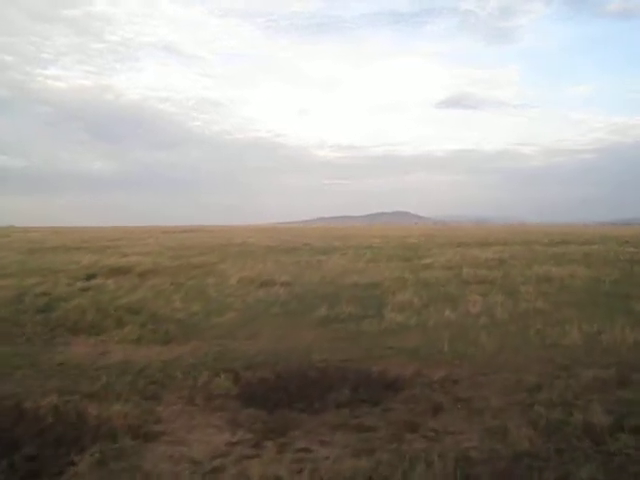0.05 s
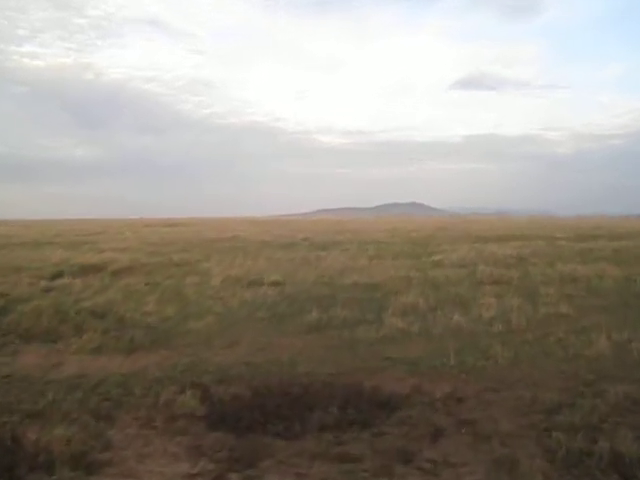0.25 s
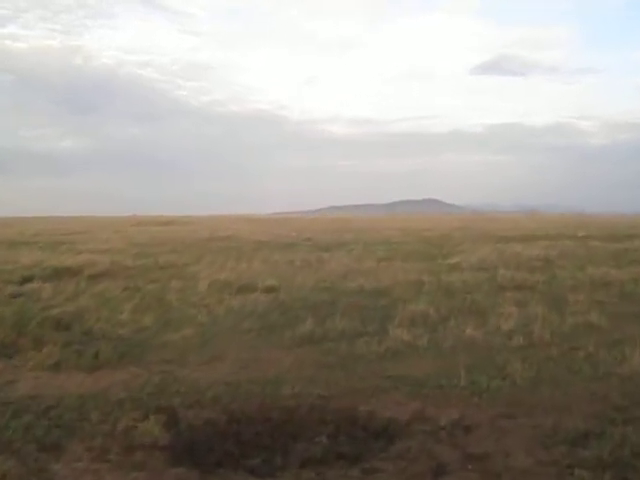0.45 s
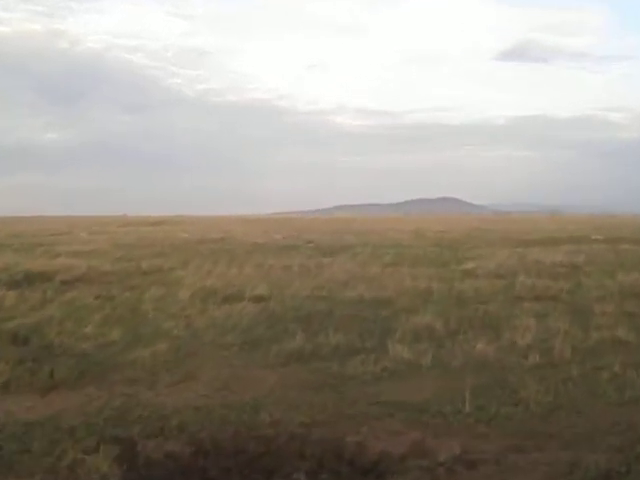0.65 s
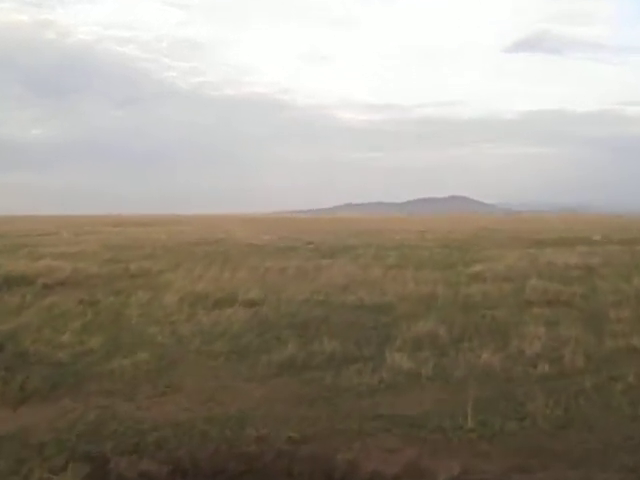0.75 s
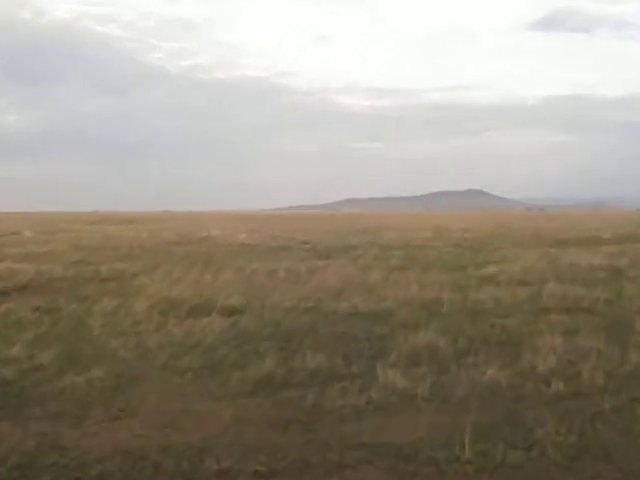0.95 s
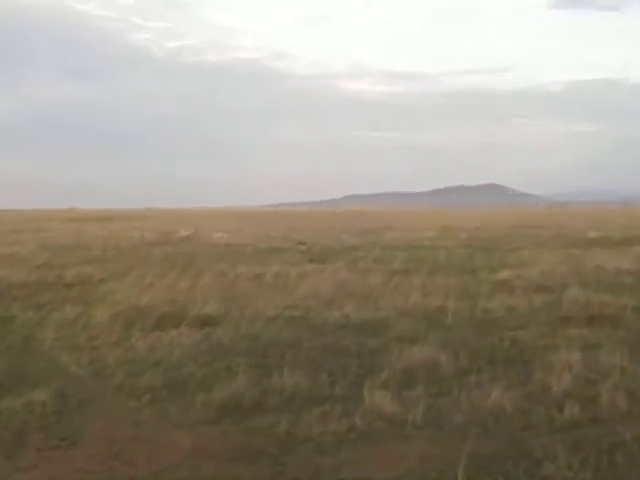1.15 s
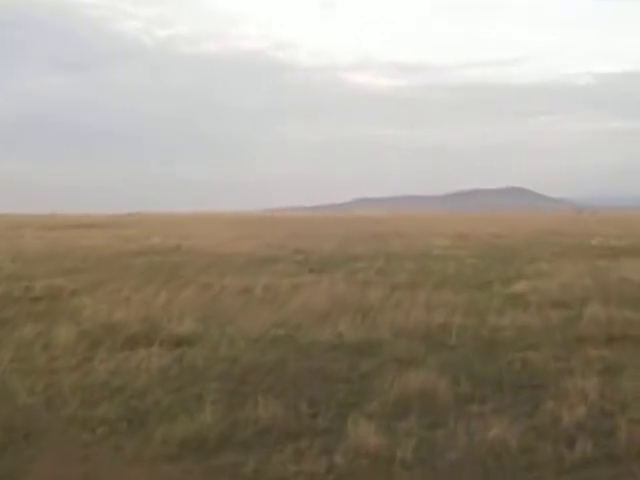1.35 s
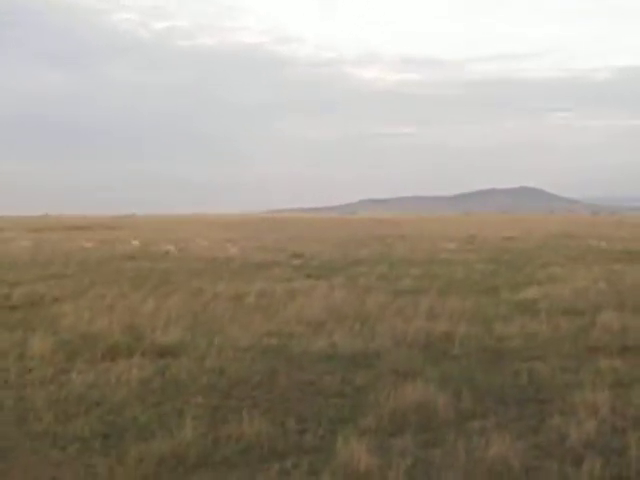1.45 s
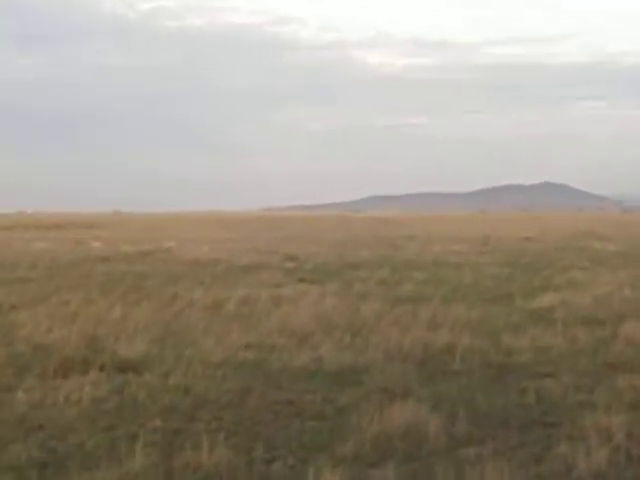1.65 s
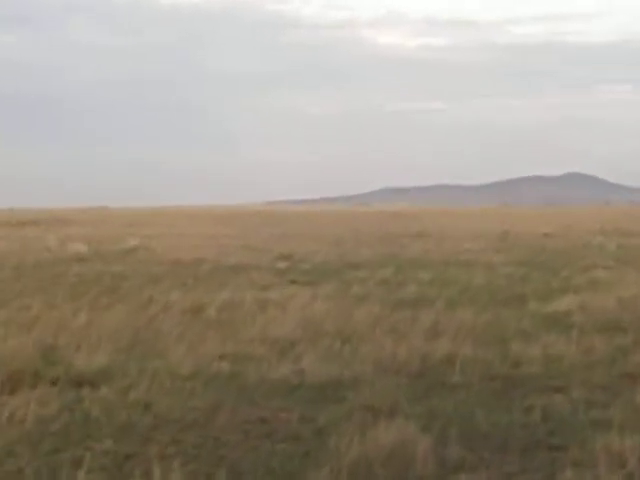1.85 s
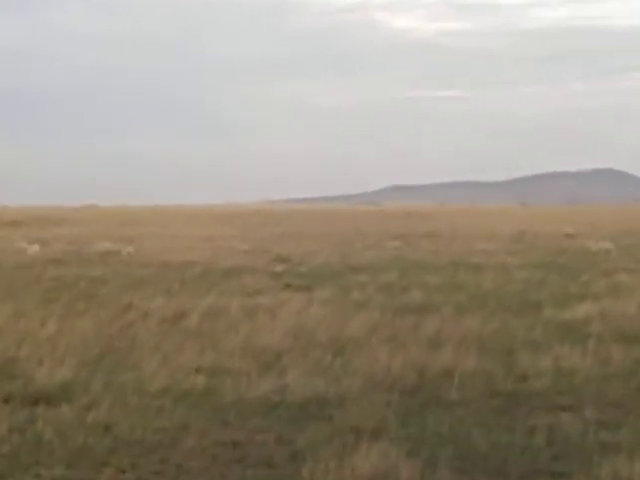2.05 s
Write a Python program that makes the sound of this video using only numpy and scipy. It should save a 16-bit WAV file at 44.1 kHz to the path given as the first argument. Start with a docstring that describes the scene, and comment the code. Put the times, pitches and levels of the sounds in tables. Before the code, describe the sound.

A hot-air balloon burner lights with a whump, roars and hisses, then dies away.

```python
"""Hot-air balloon burner

One blast of propane, heard from the basket low over open grassland. Two light scuffs, then the
valve opens, the gas lights with a whump, and a turbulent flame roars under the hiss of the jets.
The hiss dulls as the flow eases; the flame dies away, leaving faint open air."""
import sys
import numpy as np
from scipy import signal
from scipy.fft import rfft, irfft
from scipy.io import wavfile

SR = 44100
rng = np.random.default_rng(int(sys.argv[2]) if len(sys.argv) > 2 else 0)


def file_out(sig):
    """Save sig as 16-bit WAV at sys.argv[1]."""
    # one column per channel
    cols = np.atleast_2d(sig).T
    # limit, then scale
    lim = np.clip(cols, -1, 1)
    pcm = np.round(lim * 32767).astype(np.int16)
    wavfile.write(sys.argv[1], SR, pcm)


N = 92610
T = np.arange(N) / SR
HZ = np.maximum(np.fft.rfftfreq(N, 1 / SR), 1)
LIGHT_S, CATCH_S = 0.238, 0.01   # when the gas lights; how long the flame takes to catch
WAVER_HZ = 25   # how fast each noise band wavers


# Tone of the roar: freq_hz, level_db
ROAR_SPECTRUM = [(20, -20), (35, -10), (50, -4.5), (65, -3.5), (88, -12.5), (120, -1), (155, 1),
                 (195, -2.5), (240, 1.5), (280, -6), (350, -1.5), (400, -8), (445, -13.5), (500, -6.5),
                 (550, -6), (610, -5), (670, -9), (735, -16), (850, -15.5), (960, -16.5), (1040, -20.5),
                 (1120, -17.5), (1330, -19), (1480, -22.5), (1750, -28.5), (3000, -37), (6000, -47.5),
                 (16000, -74)]
# Envelope of the flame: time_s, level_db
FLAME_ENVELOPE = [(.27, -17), (.35, -20), (.46, -18), (.52, -20.5), (.68, -19.6), (.85, -19.5),
                  (1.0, -20.5), (1.15, -20.5), (1.32, -20), (1.44, -21), (1.52, -20.5), (1.68, -22),
                  (1.82, -25.5), (1.92, -34.5), (2.0, -49.5), (2.1, -62)]
# Short swells as the flame billows: centre_s, boost_db, half_width_s
BILLOWS = [(0.421, 2, 0.012), (0.829, 2, 0.027), (1.071, 5, 0.0052), (1.342, 2, 0.044),
           (1.441, 3.5, 0.0082)]


def flame():
    """The low roar of burning gas, flickering with its eddies and billowing now and then."""
    roar = turbulence(ROAR_SPECTRUM, envelope(FLAME_ENVELOPE), dulling=0.078, pivot_hz=246)
    billow_db = sum(db * np.exp(-((T - centre_s) / half_s) ** 2) for centre_s, db, half_s in BILLOWS)
    flicker_db = 0.33 * drift(rate_hz=90)
    return roar * ramp(LIGHT_S, CATCH_S) * from_db(0.5 + billow_db + flicker_db)


# Tone of the hiss: freq_hz, level_db
HISS_SPECTRUM = [(300, -10), (1200, -2.5), (2100, 2.5), (2400, -0.5), (3100, 2.5), (4300, -3.5), (5600, -6),
                 (7000, -9.5), (8500, -12), (10000, -8), (12500, -9.5), (14000, -12), (16000, -18.5)]
# Envelope of the hiss, riding the gas flow: time_s, level_db
FLOW_ENVELOPE = [(.25, -38.5), (.3, -35.5), (.4, -33.5), (.52, -36), (.6, -33.5), (.82, -34.5), (.94, -36),
                 (1.1, -37), (1.3, -39), (1.44, -42.5), (1.6, -42.5), (1.8, -50.7), (1.92, -60), (2.1, -80)]


def jets():
    """Propane spurts from the nozzles, then hisses and sputters at full flow."""
    hiss = turbulence(HISS_SPECTRUM, envelope(FLOW_ENVELOPE), dulling=0.13, pivot_hz=3500)
    valve = ramp(start_s=0.2145, rise_s=0.0099)
    spurt_db = -9 * (1 - ramp(LIGHT_S, CATCH_S))   # softer until the gas lights
    sputter_db = 0.5 * drift(rate_hz=220)
    return hiss * valve * from_db(0.5 + spurt_db + sputter_db)


# Tone of the whump: freq_hz, level_db
WHUMP_SPECTRUM = [(20, -10), (52, -3), (85, -10), (140, -0.5), (280, 1.5), (400, -3), (560, -6), (760, -11),
                  (1250, -15.5), (1600, -14), (1800, -25), (3200, -26.5), (6000, -38), (16000, -50)]
# Pressure pops as the gas cloud lights: start_s, level_db
POPS = [(.2445, -15.5), (0.2578, -7.5), (0.2642, -9)]
# Partials of the boom that each pop sets off: pitch_hz, level_db, t60_s
BOOM_PARTIALS = [(58, -3, 0.29), (139.6, 4, 0.071), (269, -1, 0.051), (541, 1, 0.074), (1100, -16.5, .06)]


def ignition():
    """The flame front swells through the gas cloud and ends in booming pops."""
    peak_s, hold_s, decay_s = 0.255, 0.0077, 0.0029
    swell = ramp(LIGHT_S, peak_s - LIGHT_S) * decay(peak_s + hold_s, decay_s)
    whump = from_db(-15) * swell * noise(WHUMP_SPECTRUM)
    for start_s, pop_db in POPS:
        age = np.maximum(T - start_s, 0)
        for pitch_hz, partial_db, t60_s in BOOM_PARTIALS:
            whump += from_db(pop_db + partial_db - 60 * age / t60_s) * np.sin(2 * np.pi * pitch_hz * age)
    return whump


# Light scuffs just before the valve opens: start_s, level_db, centre_hz
SCUFFS = [(.116, -56, 11000), (.195, -56, 6000)]


def scuffs(width_hz=5000):
    """Brief bright rubs, as of a glove on the valve handle."""
    out = np.zeros(N)
    radius = np.exp(-np.pi * width_hz / SR)
    for start_s, level_db, centre_hz in SCUFFS:
        resonance = [1, -2 * radius * np.cos(2 * np.pi * centre_hz / SR), radius ** 2]
        rub = unit_power(signal.lfilter([1, 0, -1], resonance, rng.standard_normal(N)))
        out += from_db(level_db) * rub * ramp(start_s, rise_s=0.002) * decay(start_s, decay_s=0.015)
    return out


# Tone of the air bed: freq_hz, level_db
AIR_SPECTRUM = [(20, -6), (60, 7), (95, -2), (150, 2), (250, -1), (350, -1), (600, -4.5), (900, -10.5),
                (1400, -9), (2050, -7.5), (2600, -13.5), (3750, -7.5), (4400, -18), (5200, -18),
                (6200, -23.5), (10000, -25), (16000, -34)]
# Slow fade on the bed's treble: time_s, gain_db
AIR_TREBLE_FADE = [(.2, 1), (2.0, -5.5)]


def open_air(level_db=-48.5, treble_hz=1500):
    """A faint rumble and rustle of moving air."""
    treble_db = envelope(AIR_TREBLE_FADE)
    return sum(band * from_db(level_db + treble_db * (hz > treble_hz) - 0.2 * drift(WAVER_HZ))
               for hz, band in octaves(noise(AIR_SPECTRUM)))


def turbulence(spectrum, level_db, dulling, pivot_hz):
    """Rushing gas: its bands waver, and it tilts darker by `dulling` dB per octave for each dB it sinks."""
    tilt_db = dulling * (level_db - level_db.max())
    out = np.zeros(N)
    for hz, band in octaves(noise(spectrum)):
        octaves_up = max(np.log2(hz / pivot_hz), -1)
        out += band * from_db(level_db + tilt_db * octaves_up + 0.5 * drift(WAVER_HZ))
    return out


def noise(spectrum):
    """Coloured noise of unit power."""
    hz, db = np.transpose(spectrum)
    colour = from_db(np.interp(np.log(HZ), np.log(hz), db))
    return unit_power(irfft(rfft(rng.standard_normal(N)) * colour, N))


def octaves(x):
    """Overlapping octave bands that sum to the whole, as (centre_hz, band) pairs."""
    centres_hz = 50 * 2. ** np.arange(9)
    shares = [np.interp(np.log(HZ), np.log(centres_hz), row) for row in np.eye(len(centres_hz))]
    whole = rfft(x)
    return [(hz, irfft(whole * share, N)) for hz, share in zip(centres_hz, shares)]


def drift(rate_hz):
    """Smooth random motion of spread 1."""
    return unit_power(irfft(rfft(rng.standard_normal(N)) / (1 + (HZ / rate_hz) ** 2), N))


def envelope(points):
    """Breakpoints joined by straight lines."""
    return np.interp(T, *np.transpose(points))


def ramp(start_s, rise_s):
    """A rise from 0 to 1."""
    return np.clip((T - start_s) / rise_s, 0, 1)


def decay(start_s, decay_s):
    """Holds at 1, then falls exponentially."""
    return np.exp(-np.maximum(T - start_s, 0) / decay_s)


def from_db(db):
    """Decibels to gain."""
    return 10 ** (np.asarray(db) / 20)


def unit_power(x):
    """Scale to an RMS of 1."""
    return x / np.sqrt(np.mean(x ** 2) + 1e-20)


def limiter(x, threshold_db=-8, share=0.4, attack_s=0.006, recovery_db_per_s=72):
    """The gain ducks by a share of a loud peak's overshoot and recovers steadily."""
    over_db = np.maximum(20 * np.log10(np.abs(x) + 1e-9) - threshold_db, 0)
    recovery_db = recovery_db_per_s * T
    held_db = np.maximum.accumulate(over_db + recovery_db, axis=-1) - recovery_db
    pole = np.exp(-1 / (attack_s * SR))
    return x * from_db(-share * signal.lfilter([1 - pole], [1, -pole], held_db))


def scene():
    """The burner overhead, with nothing around to echo."""
    return (ignition() + flame() + jets() + open_air() + scuffs())[None]


def record(dry):
    """The microphone sheds the deepest bass, the ignition ducks the gain, peaks round off, the top is cut."""
    low_cut_hz, high_cut_hz, ceiling = 34, 15700, 0.79
    low_cut = signal.butter(2, low_cut_hz, "high", fs=SR, output="sos")
    high_cut = signal.ellip(12, 0.1, 80, high_cut_hz, fs=SR, output="sos")
    ducked = limiter(signal.sosfilt(low_cut, dry))
    rounded = ducked / (1 + (ducked / ceiling) ** 4) ** (1 / 4)
    return signal.sosfilt(high_cut, rounded)


dry = scene()
out = record(dry)
file_out(out)
```